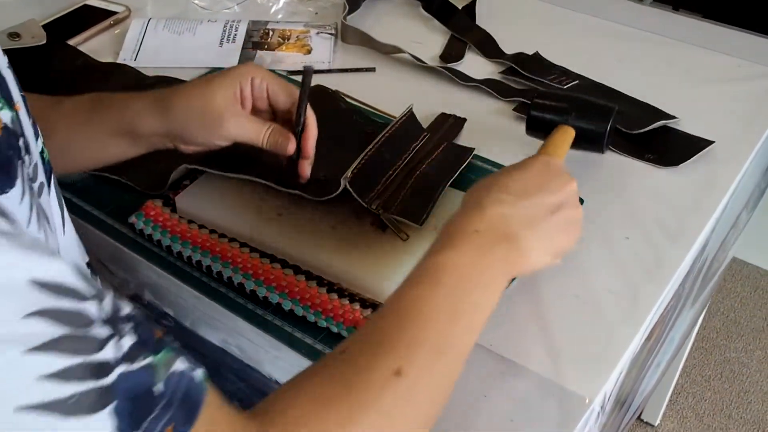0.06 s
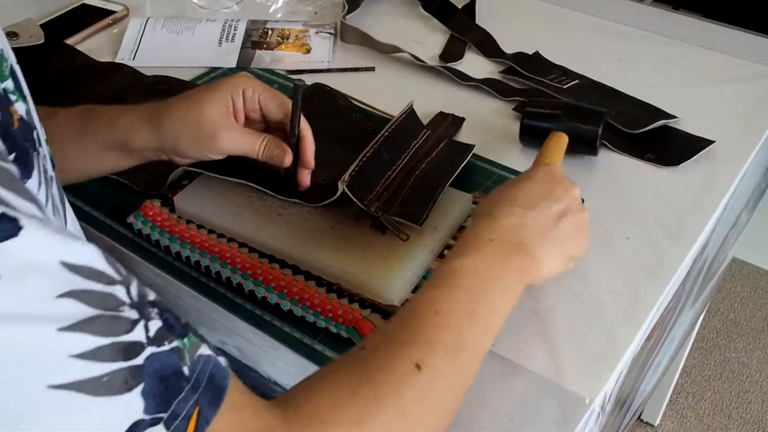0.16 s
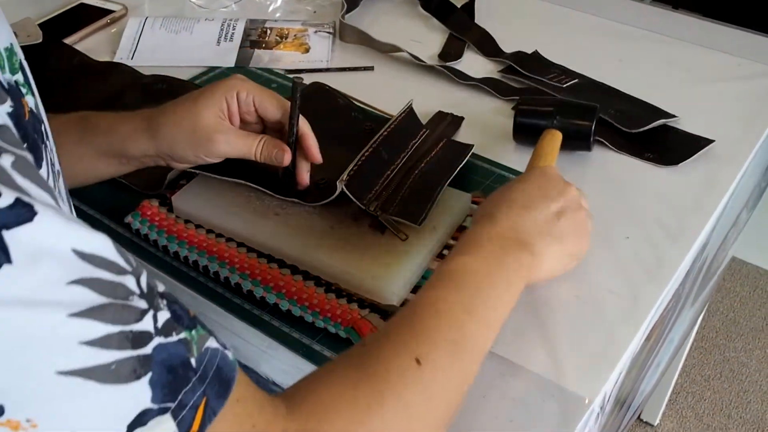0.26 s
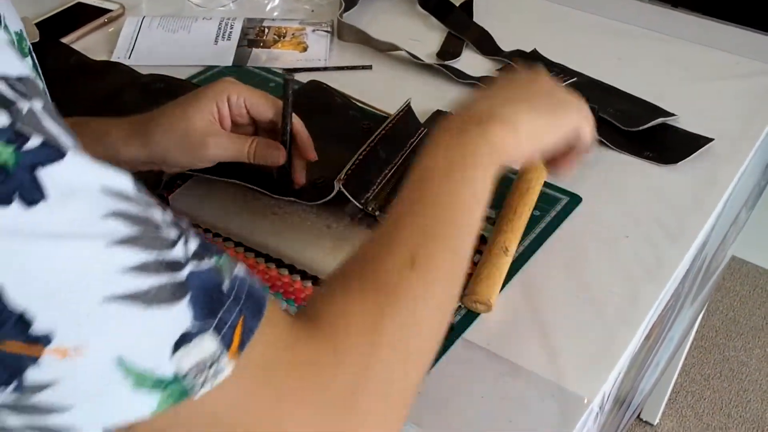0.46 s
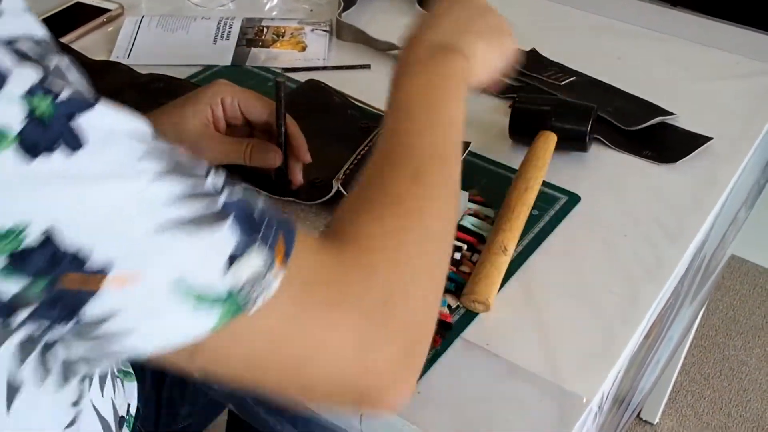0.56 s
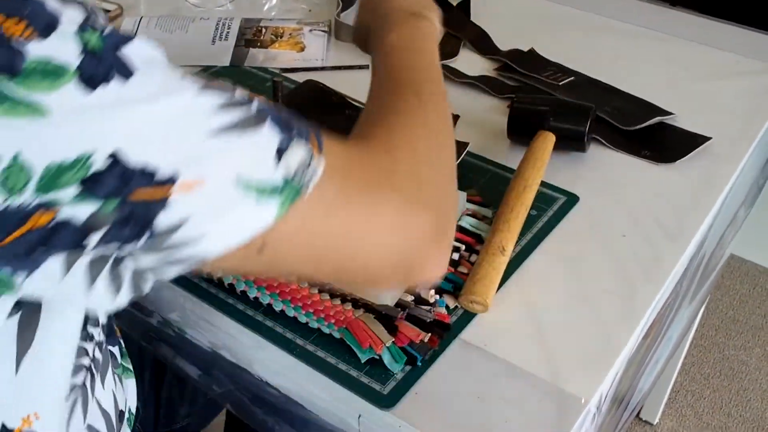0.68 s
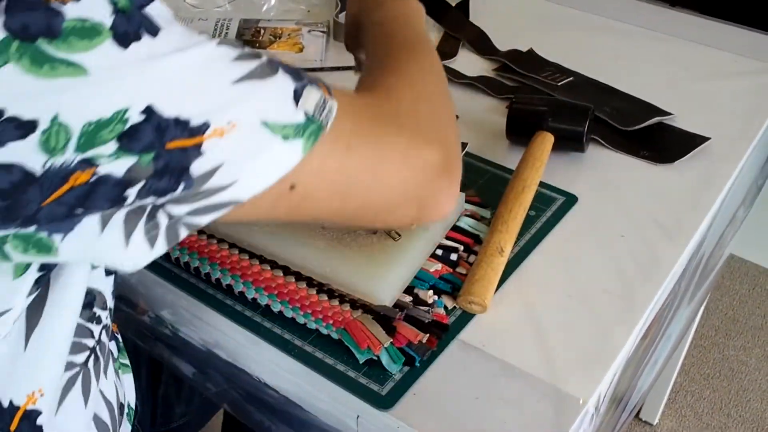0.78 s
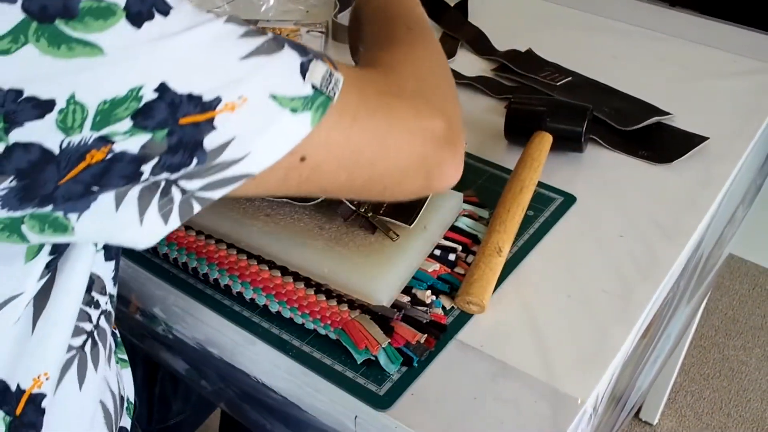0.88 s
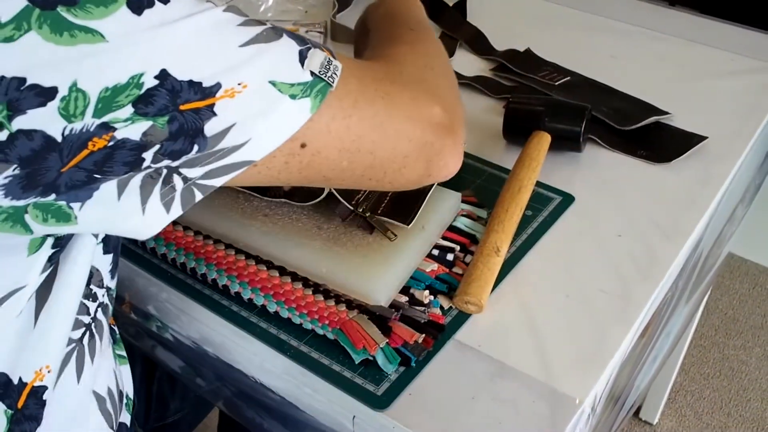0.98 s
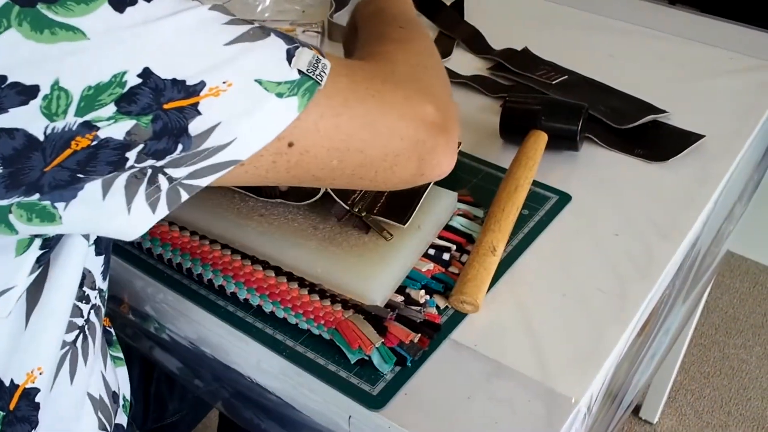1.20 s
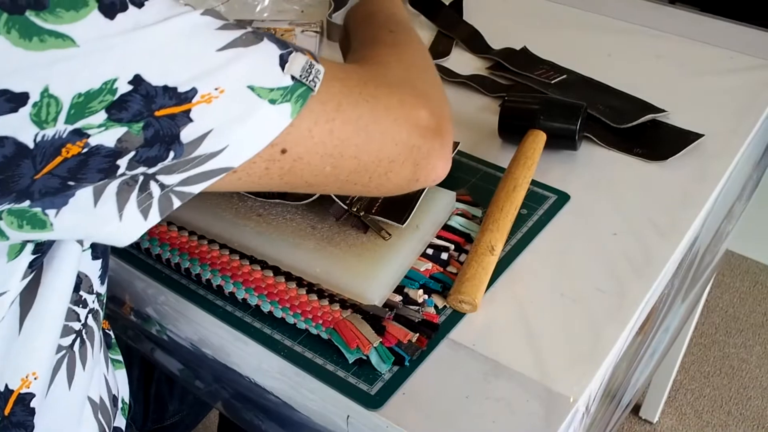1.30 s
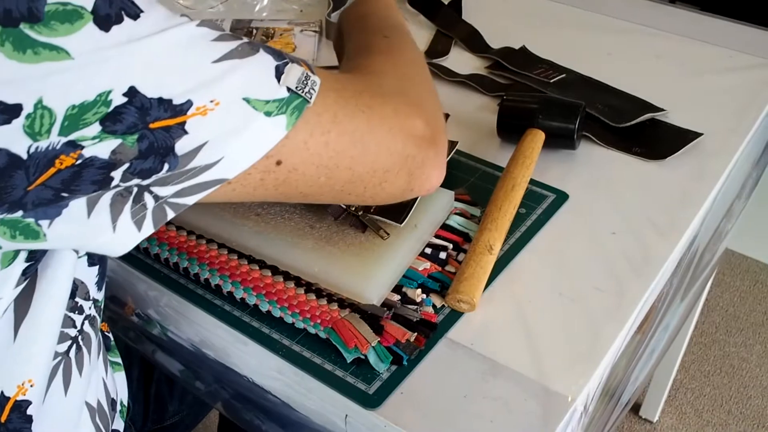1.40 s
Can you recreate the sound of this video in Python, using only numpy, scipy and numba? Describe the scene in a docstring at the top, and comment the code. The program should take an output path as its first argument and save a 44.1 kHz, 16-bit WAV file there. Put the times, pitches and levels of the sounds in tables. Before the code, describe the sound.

A mallet thumps down on a work table, its wooden handle knocking, over steady ventilation.

```python
"""A mallet laid on a work table, close to a stereo microphone in a small, bare workshop.
Its padded head lands with a dull thump that sets the table ringing; then the wooden handle drops
with a sharp knock, a little to the right, and chatters faintly. A hand brushes leather, barely heard.
Ventilation rushes steadily behind, and the recorder's gain dips a little after the blows."""
import sys
import numpy as np
from scipy import signal
from scipy.fft import rfft, irfft
from scipy.io import wavfile
from numba import njit

SR = 44100
rng = np.random.default_rng(int(sys.argv[2]) if len(sys.argv) > 2 else 0)


def dump(signal):
    """Clip the signal to [-1, 1] and save it as 16-bit WAV at the path in sys.argv[1]."""
    limited = np.clip(np.atleast_2d(signal).T, -1, 1)
    pcm = np.round(limited * 32767).astype(np.int16)
    wavfile.write(sys.argv[1], SR, pcm)


N = 63945
TIME, FREQS = np.arange(N) / SR, np.fft.rfftfreq(N, 1 / SR)


def undb(db):
    """Decibels to amplitude."""
    return 10 ** (np.asarray(db) / 20)


def unit(x):
    """Scale to rms 1."""
    return x / np.sqrt(np.mean(x ** 2))


def curve(points, hz):
    """Read (f/Hz, value) points on a log-frequency axis."""
    f, values = np.array(points, float).T
    return np.interp(np.log(np.maximum(hz, 1)), np.log(f), values)


def colour(noise, points):
    """Shape noise by (f/Hz, level/dB) points; rms 1."""
    return unit(irfft(rfft(noise) * undb(curve(points, FREQS)), N))


def fade(t60, start=0):
    """Exponential decay from a starting time."""
    age = TIME - start
    return (age >= 0) * np.exp(-np.log(1000) * np.maximum(age, 0) / t60)


def convolve(x, response):
    """Pass a signal through the response of a body or a room."""
    return signal.fftconvolve(np.atleast_2d(x), np.atleast_2d(response), axes=-1)[:, :N]


def diffuse():
    """Diffuse noise at the microphone: left and right alike in the bass, unrelated in the treble."""
    # likeness of the two channels: f/Hz, correlation
    likeness = [(60, .9), (300, 0.84), (700, 0.81), (1300, .58), (2500, 0), (5000, 0.042), (15000, 0.09)]
    correlation = curve(likeness, FREQS)
    mid, side = rfft(rng.standard_normal((2, N))) * np.sqrt([1 + correlation, 1 - correlation])
    return unit(irfft(np.array([mid + side, mid - side]), N))


def noise_band(detuning):
    """Diffuse noise in one band, at half amplitude where the detuning is 1; rms 1."""
    return unit(irfft(rfft(diffuse()) / (1 + detuning ** 2), N))


def ring(modes, lag_s=0):
    """Damped sines of a struck body; higher bending waves travel faster and arrive sooner."""
    out = 0
    for hz, db, t60 in modes:
        start = lag_s + .0006 * np.sqrt(1000 / hz)
        out = out + undb(db) * np.sin(2 * np.pi * hz * (TIME - start)) * fade(t60, start)
    return out


def contacts(rows):
    """Force of a series of contacts: each a smooth bump, duller when longer."""
    force = 0
    for start, db, length in rows:
        age = np.maximum(TIME - start, 0) / (length / np.pi / 2)
        bump = age * np.exp(-age)
        force = force + undb(db) * bump / bump.sum()
    return force


def radiate(x, low_hz):
    """Steep bass roll-off of a body of limited size."""
    return signal.sosfilt(signal.butter(4, low_hz, "high", fs=SR, output="sos"), x)


def workshop():
    """Response of the bare walls, unit energy: dense echoes whose treble dies first."""
    # reverberation time: f/Hz, t60/s
    decay = [(100, 0.57), (500, 0.61), (1500, 0.5), (4000, 0.35), (12000, 0.29)]
    gap_s, build_s = .0023, .002
    hz, t, cells = signal.stft(diffuse(), SR, nperseg=256)
    cells = cells * np.exp(-np.log(1000) * t / curve(decay, hz)[:, None])
    tail = signal.istft(cells, SR)[1][:, :N]
    onset = np.clip((TIME - gap_s) / build_s, 0, 1)
    return unit(tail * onset) / np.sqrt(N)


def ventilation():
    """Room tone: a rush of air that wavers slightly in level, with a low duct resonance."""
    # spectrum of the rush: f/Hz, level/dB
    spectrum = [(15, -51), (25, -17), (32, -29), (49, -18.5), (123, -6), (161, -5.5), (195, -1.5),
                (263, -10.5), (293, -8), (394, -9), (887, -4), (1260, -10), (5280, -21.5), (9320, -28.5),
                (10400, -39.5), (12500, -31), (16000, -42.5)]
    # slow drift of the level: t/s, level/dB
    drift = [(0, 0.14), (.55, -2), (.72, 0.5), (.88, 1), (1.1, 0.5), (1.25, 0.4), (1.45, 0.25)]
    duct_hz, width_hz = 149.8, 17
    drone = undb(-49.5) * noise_band((FREQS - duct_hz) / (width_hz / 2))
    rush = undb(-36) * colour(diffuse(), spectrum)
    return (rush + drone) * undb(np.interp(TIME, *np.array(drift).T))


def leather():
    """Brief soft brushes of a hand on leather, before and after the blows."""
    # brushes: t/s, length/s, centre f/Hz, level/dB
    rustles = [(0.030, .012, 6800, -48), (1.102, .016, 3800, -43)]
    out, half_width_octaves = 0, .24
    for when, length, centre, db in rustles:
        octaves = np.log2(np.maximum(FREQS, 1) / centre)
        hiss = noise_band(octaves / half_width_octaves)
        out = out + undb(db) * hiss * np.exp(-(2 * (TIME - when) / length) ** 2)
    return out


def mallet_handle(walls):
    """The handle knocks and chatters right of centre; each contact rings the wood with a sharp crack."""
    # contacts of the handle: t/s, level/dB, contact length/s
    knocks = [(0.3888, 0, .00014), (0.3960, -17, .00004), (0.4204, -11, .00015), (0.4272, -16, .00013)]
    # modes of the wooden handle on the table: f/Hz, level/dB, t60/s
    modes = [(460, -29, .011), (680, -17, .04), (935, -31, .015), (1380, -13, .03), (1630, -14.5, .03),
             (1870, -16.5, .03), (2620, -11.5, .028), (2890, -9.5, .02), (4730, -3.5, .011),
             (5720, -7, .007), (7090, -11.5, .008), (9700, -11, .006), (12050, -12, .006),
             (14650, -23, .014)]
    # spectrum of the crack: f/Hz, level/dB
    crack_spectrum = [(200, -10), (1200, -15), (2200, -24), (3000, -30), (5500, -1), (8000, 25),
                      (16000, -2)]
    force = undb(3) * radiate(contacts(knocks), low_hz=344)
    crack = undb(-21) * colour(diffuse(), crack_spectrum) * fade(t60=.008)
    ringing = np.array([ring(modes, lag_s=.00003), ring(modes)])  # reaches the left channel later
    wood = convolve(force, ringing + crack)
    pan = undb([[-2.25], [2.25]])
    return pan * wood + undb(-4) * convolve(wood, walls)


def mallet_head(walls):
    """The padded head thuds and its cover scuffs as it settles; the table's ring swells under it."""
    # contacts of the head: t/s, level/dB, contact length/s
    thumps = [(0.2176, 0, .0006), (0.2298, -5, .003), (0.2470, -19, .0002)]
    # dead thud of the head on the table top: f/Hz, level/dB, t60/s
    thud_modes = [(300, -15, .05), (520, -7, .026), (740, -3, .018), (1050, -16, .014), (2000, -22, .015)]
    # long ring of the table: f/Hz, level/dB, t60/s
    table_modes = [(134, -18, .58), (211, -30, .45), (236, -20, .36), (305, -22, .26), (376, -15, .3),
                   (462, -24, .4), (569, -26, .5), (617, -20, .42), (685, -21, .48), (743, -27, .42),
                   (845, -26, .45), (938, -26, .33), (987, -26, .38), (1126, -29, .33)]
    # spectrum of the scuff: f/Hz, level/dB
    scuff_spectrum = [(300, 11.5), (1500, 4), (3500, -1.5), (6000, -9.5), (10000, -17), (16000, -23)]
    swell_s, scuff_lag_s, grain_db = .008, .0035, 6
    force = radiate(contacts(thumps), low_hz=124)
    thud = undb(1) * convolve(force, ring(thud_modes))
    table = convolve(force, ring(table_modes) * (1 - np.exp(-TIME / swell_s)))
    grains = diffuse() * undb(grain_db * rng.standard_normal(N))
    settling = fade(t60=.039, start=thumps[0][0] + scuff_lag_s)
    scuff = undb(-17.5) * colour(grains, scuff_spectrum) * settling
    to_walls = undb(-3.5) * thud + undb(-12.5) * table + undb(1.5) * scuff
    return thud + table + scuff + convolve(to_walls, walls)


def scene():
    """What reaches the microphone: the mallet in front, the ventilation behind."""
    walls = workshop()
    return mallet_head(walls) + mallet_handle(walls) + leather() + ventilation()


@njit
def follow(x, attack_s, release_s):
    """Level follower with separate times for rising and sinking."""
    out, level = np.empty(len(x)), 0.
    for i in range(len(x)):
        level += (x[i] - level) / (SR * (attack_s if x[i] > level else release_s))
        out[i] = level
    return out


def record(dry):
    """Microphone and recorder: treble dips, gentle gain control, full-scale clipping, treble cut-off."""
    # narrow dips in the microphone's treble: f/Hz, width/Hz, level/dB
    notches = [(6560, 470, -23), (10380, 320, -34)]
    knee_db, slope, top_hz = -31, .33, 15900
    x = dry
    for hz, width, db in notches:
        notched = signal.lfilter(*signal.iirnotch(hz, hz / width, SR), x)
        x = notched + undb(db) * (x - notched)
    level = follow(np.abs(x).mean(axis=0), attack_s=.22, release_s=.71)
    x = x * np.maximum(level / undb(knee_db), 1) ** -slope  # sinks by slope dB per dB above the knee
    cutoff = signal.ellip(10, .2, 100, top_hz, fs=SR, output="sos")
    return signal.sosfilt(cutoff, np.clip(x, -1, 1))


dry = scene()
out = record(dry)
dump(out)
```